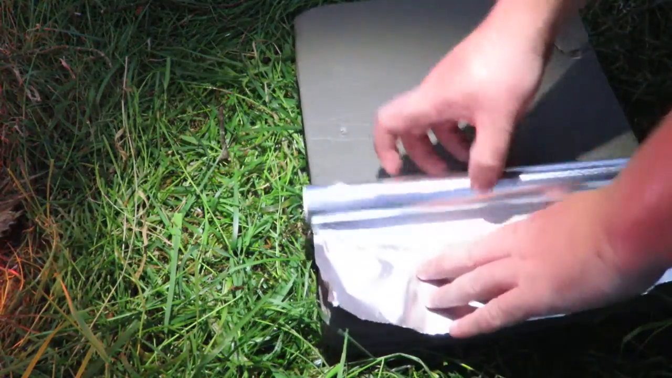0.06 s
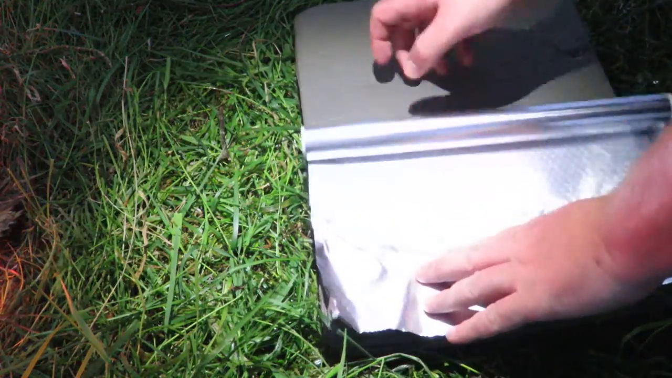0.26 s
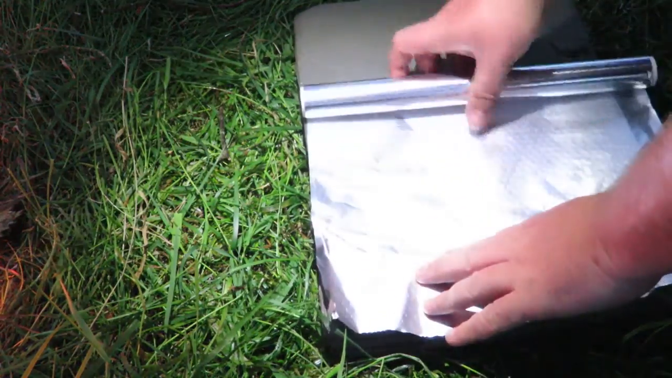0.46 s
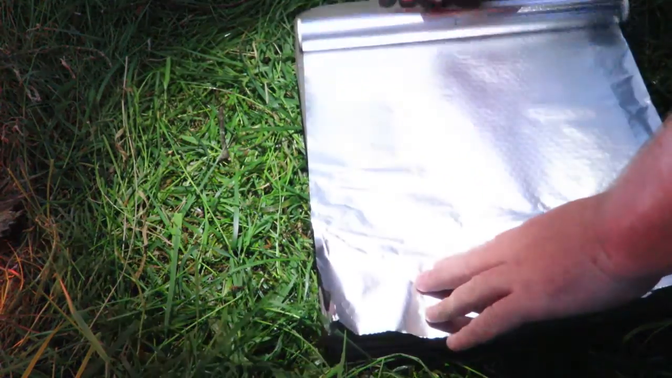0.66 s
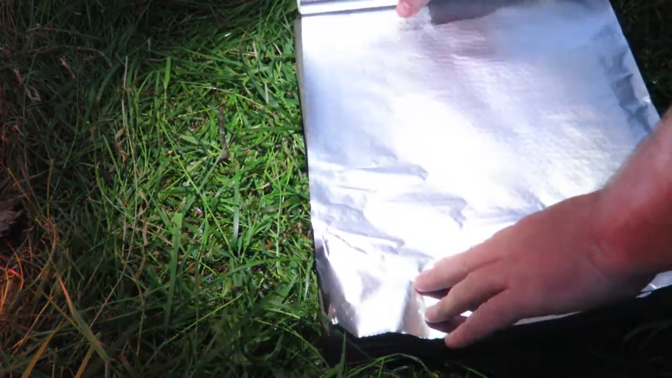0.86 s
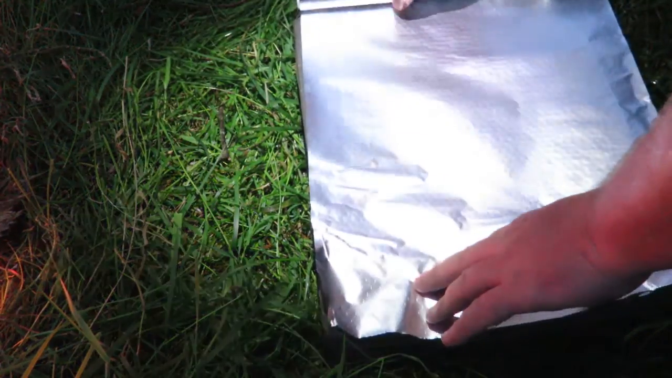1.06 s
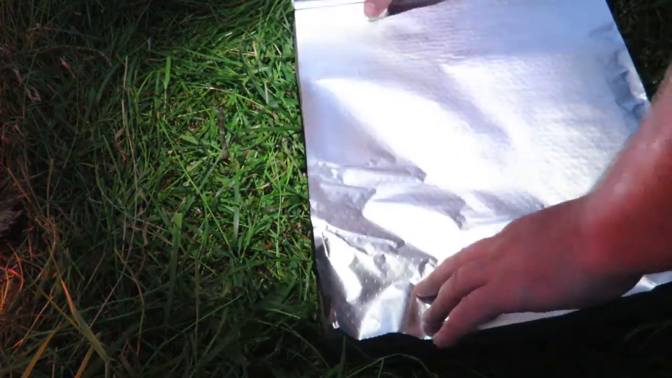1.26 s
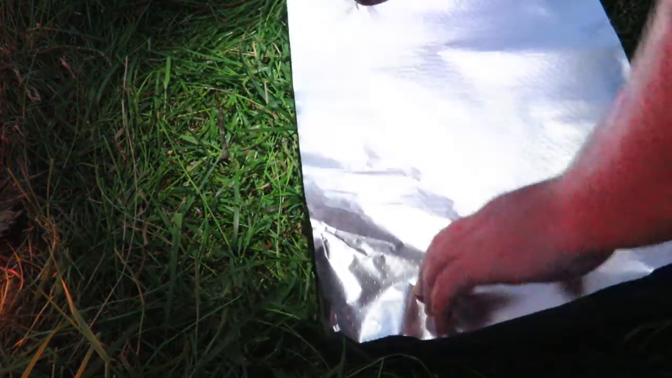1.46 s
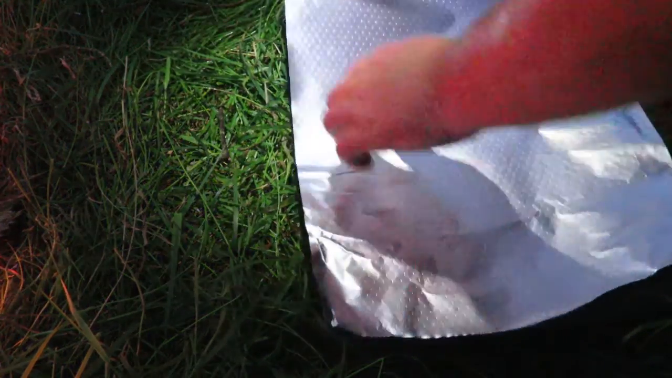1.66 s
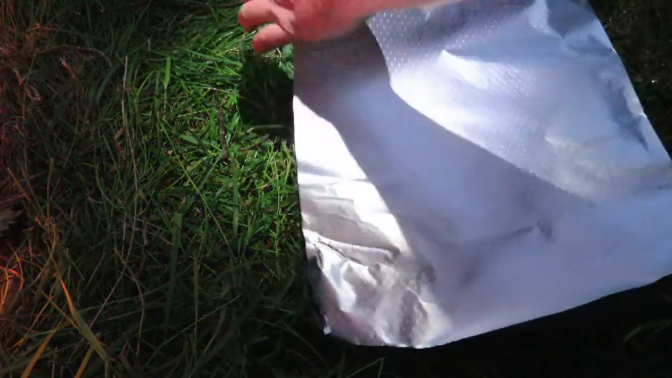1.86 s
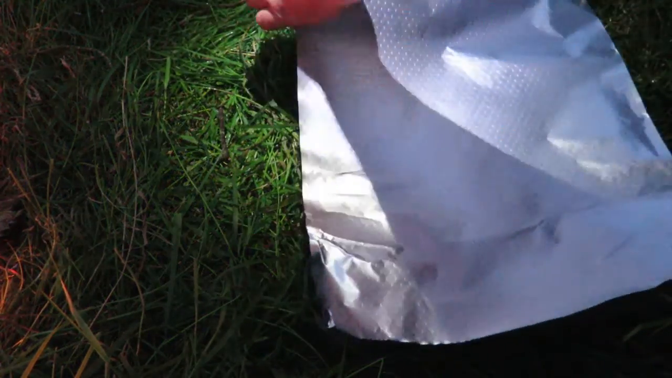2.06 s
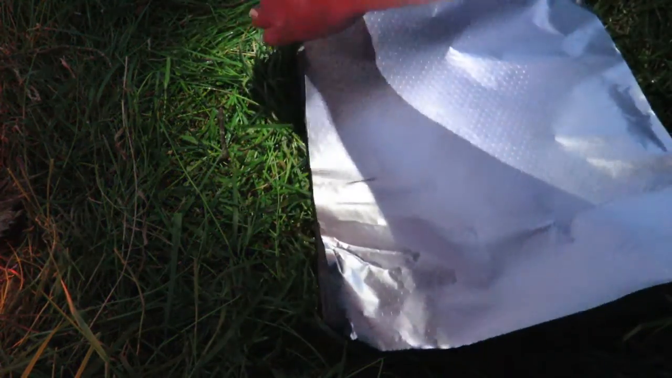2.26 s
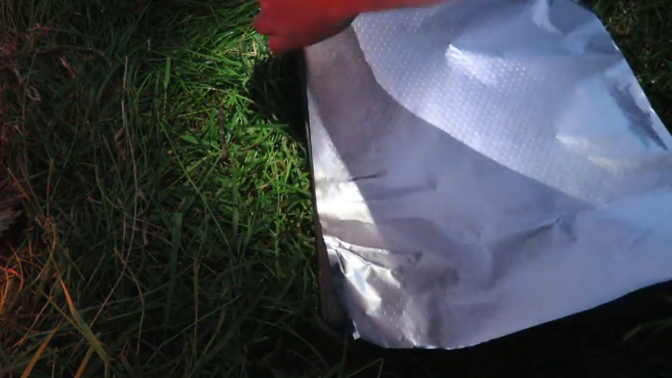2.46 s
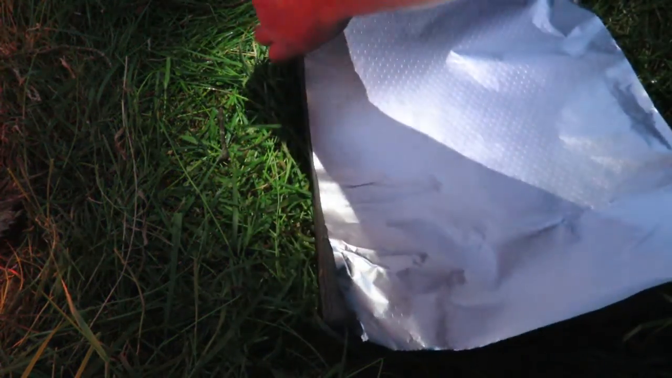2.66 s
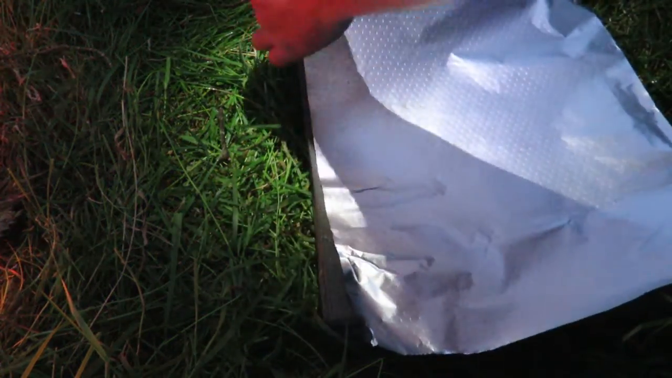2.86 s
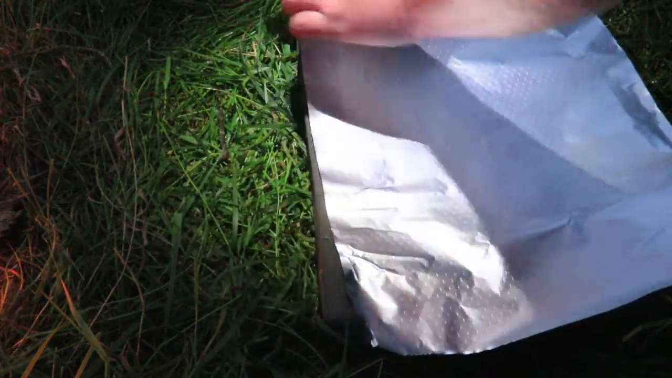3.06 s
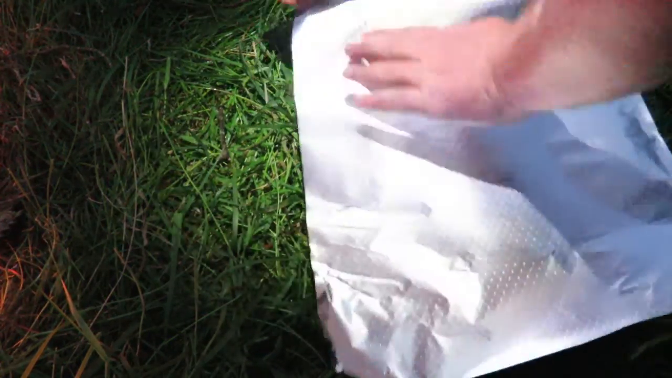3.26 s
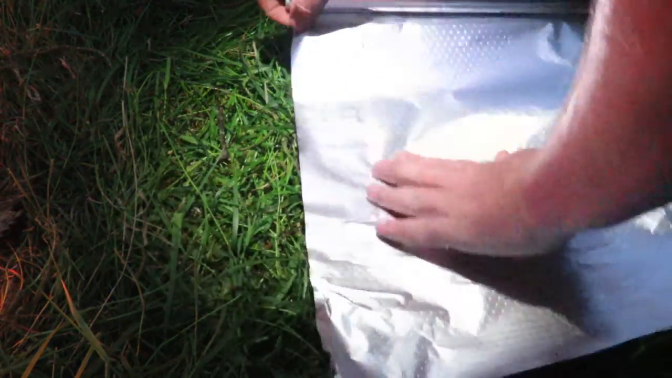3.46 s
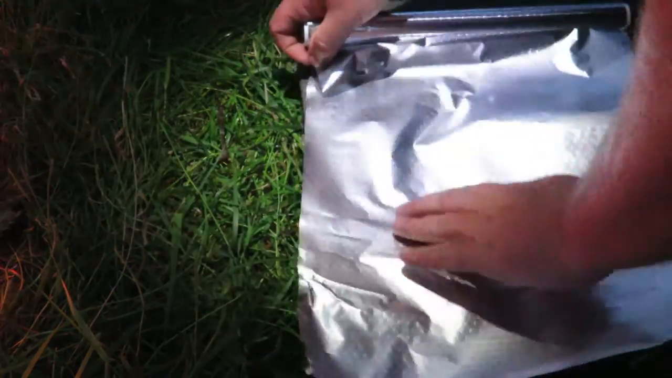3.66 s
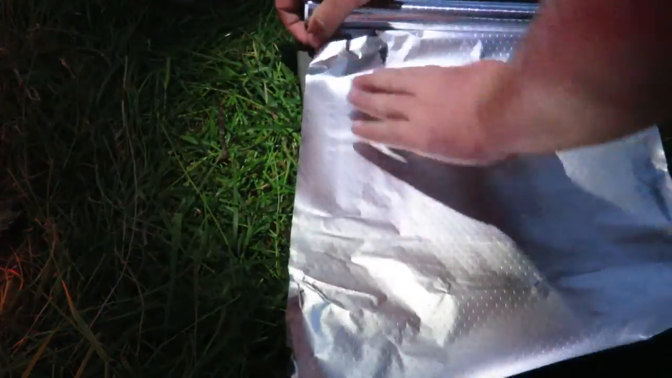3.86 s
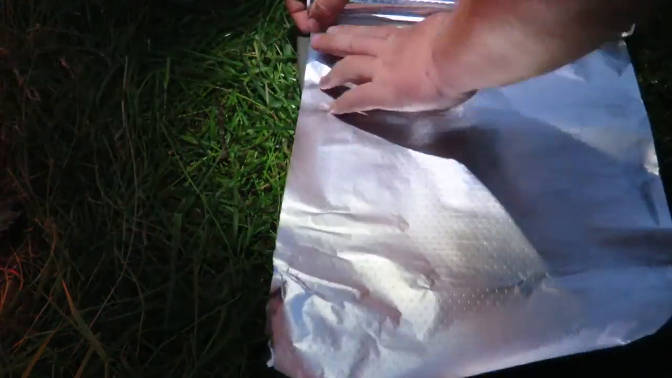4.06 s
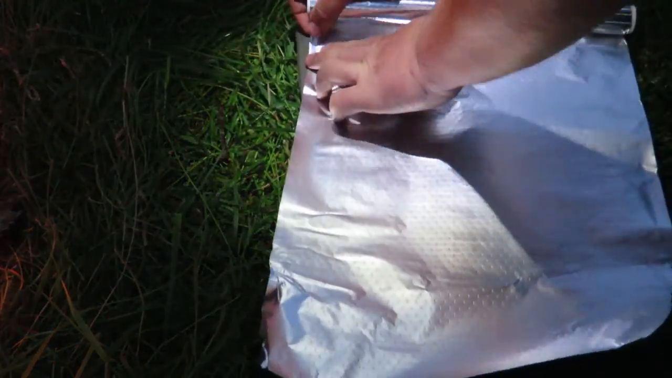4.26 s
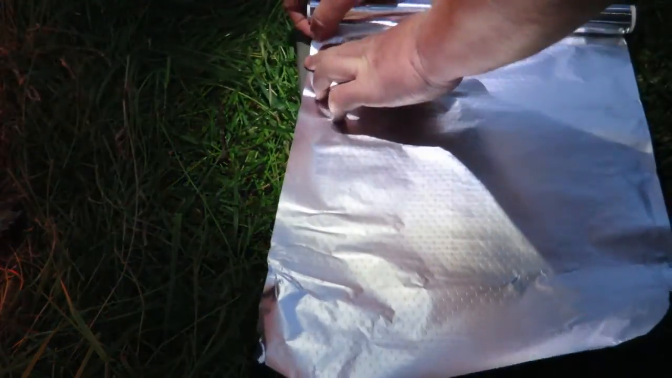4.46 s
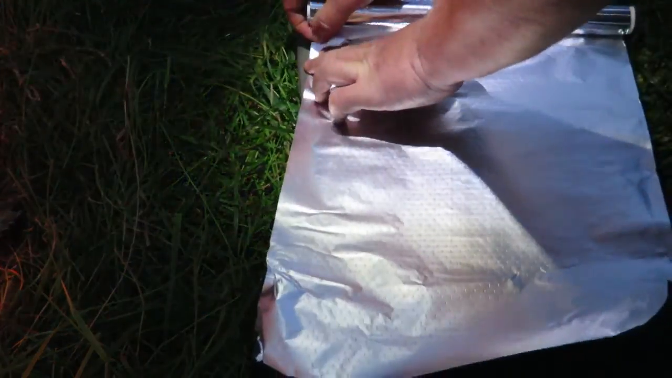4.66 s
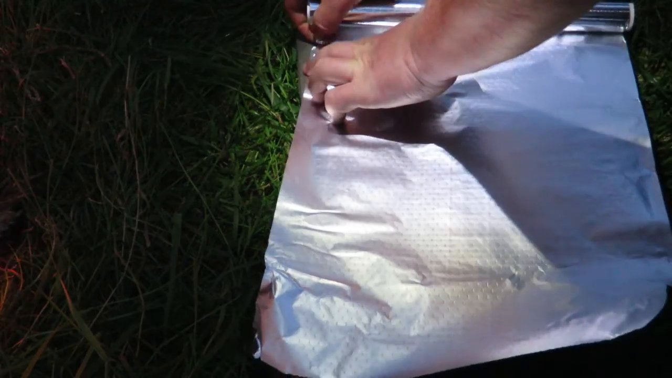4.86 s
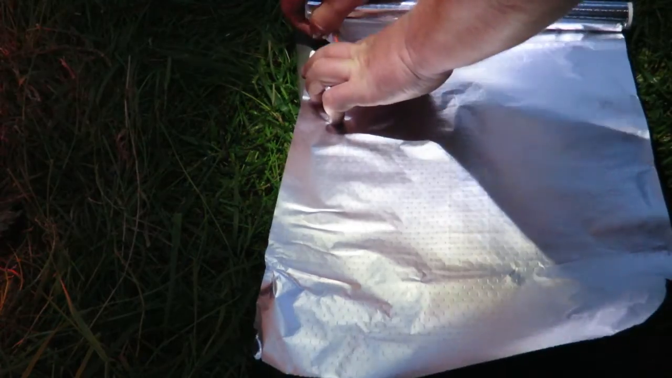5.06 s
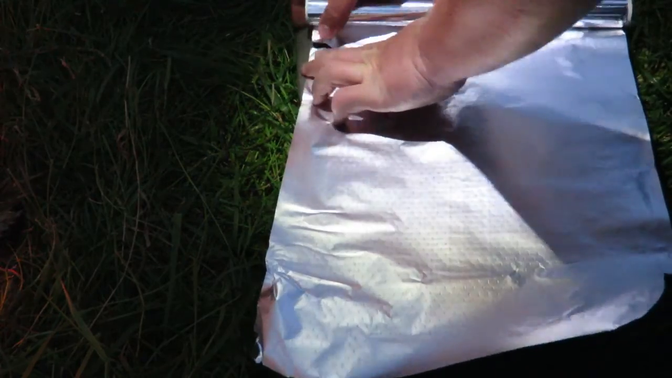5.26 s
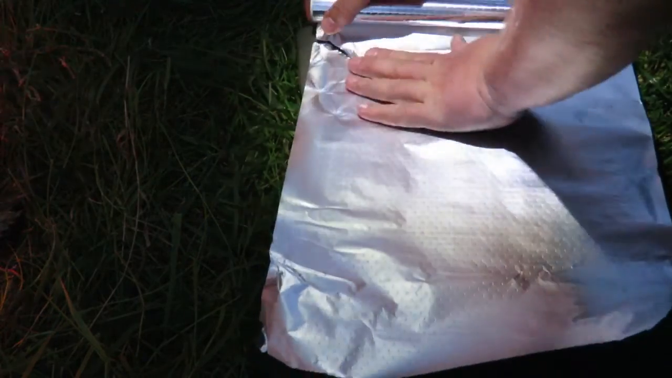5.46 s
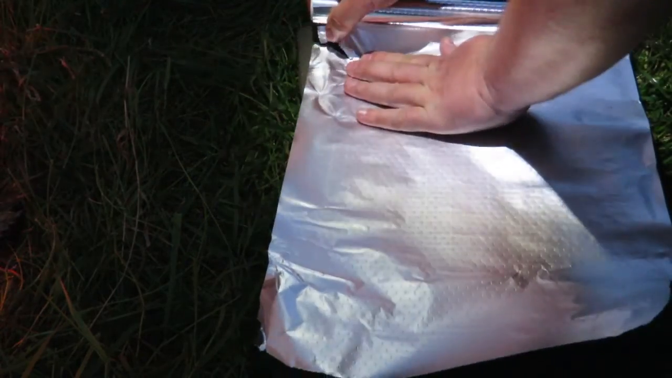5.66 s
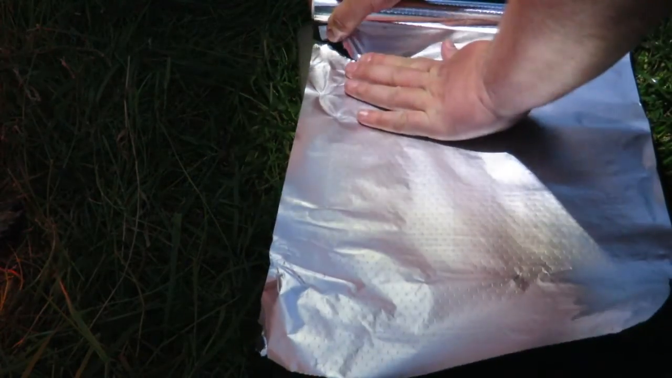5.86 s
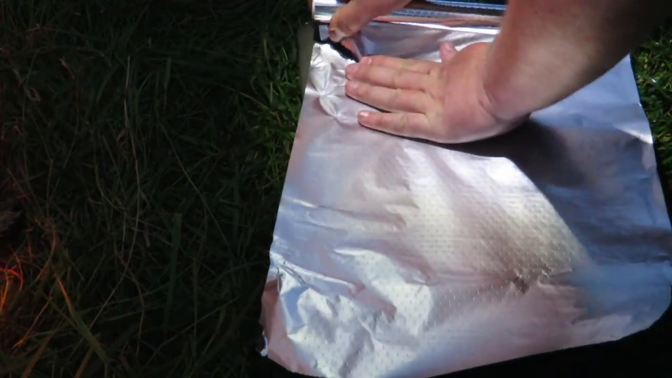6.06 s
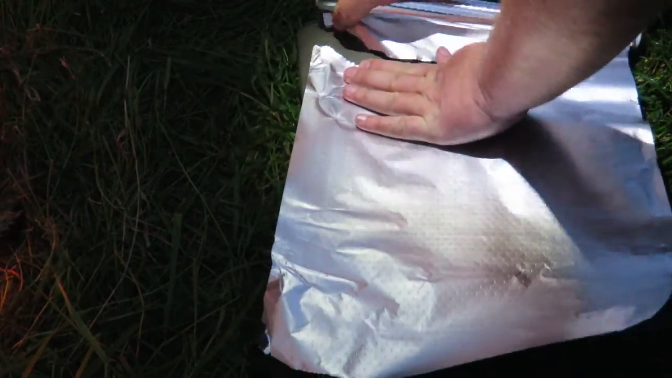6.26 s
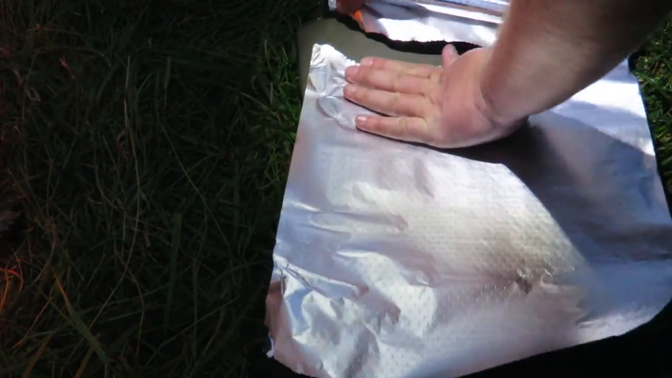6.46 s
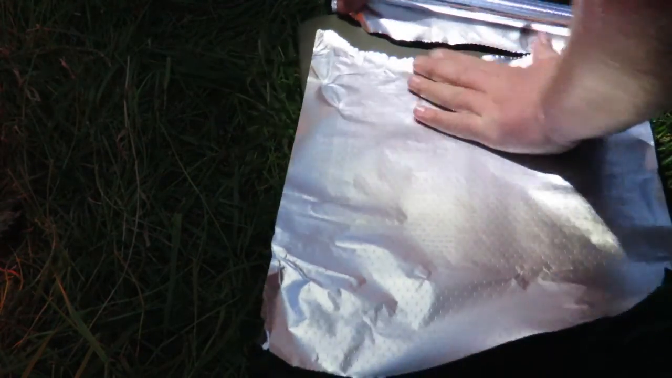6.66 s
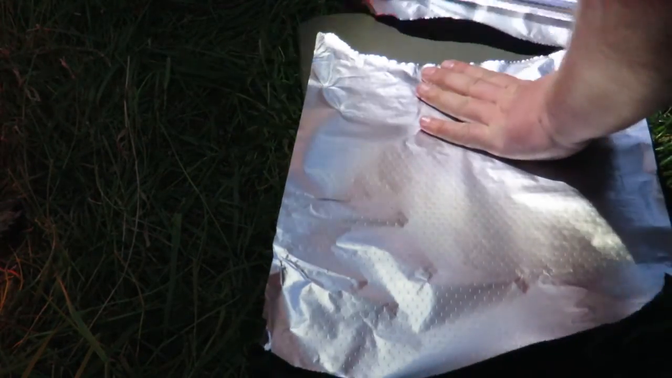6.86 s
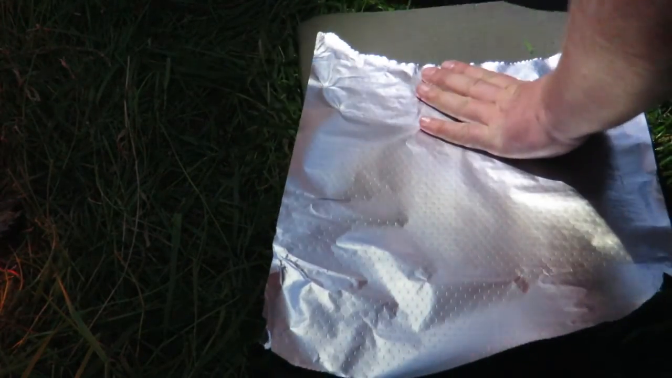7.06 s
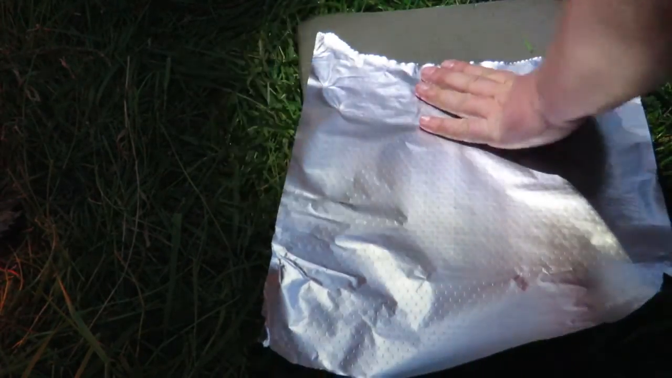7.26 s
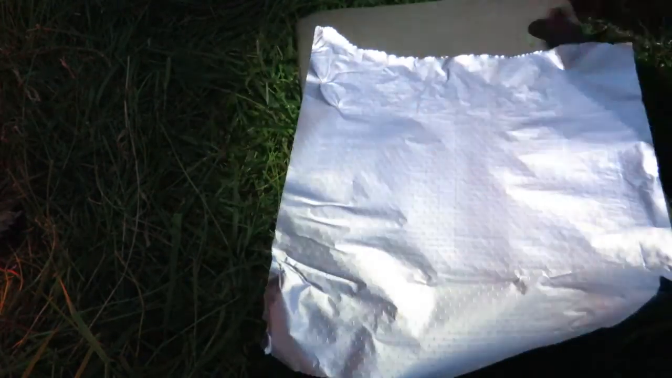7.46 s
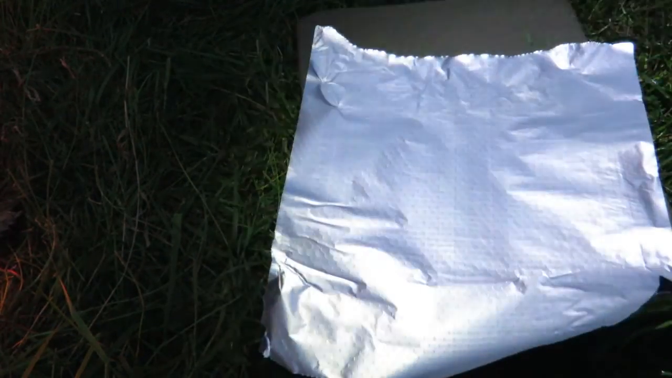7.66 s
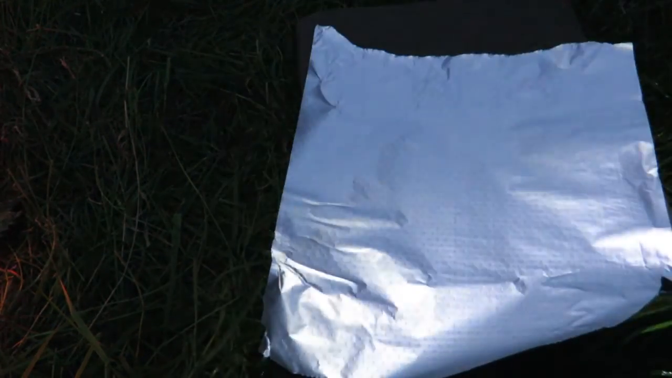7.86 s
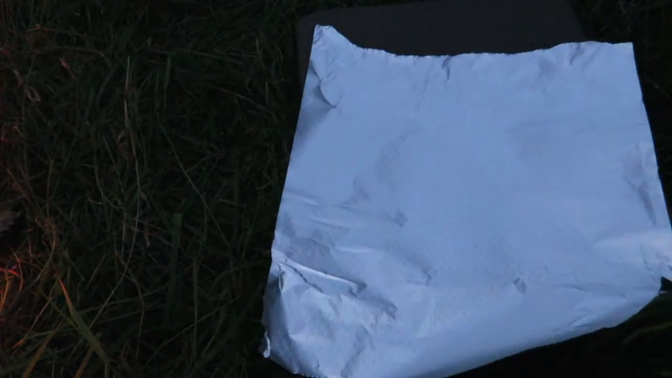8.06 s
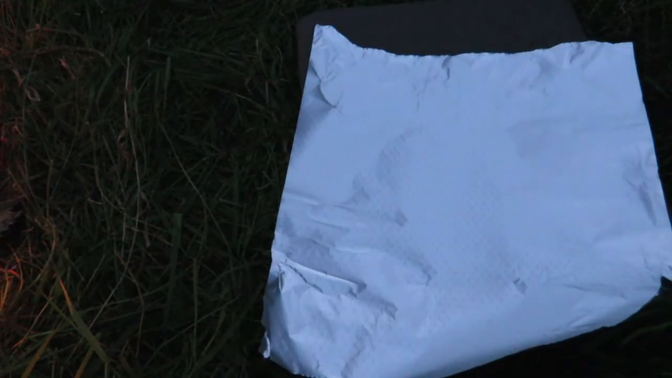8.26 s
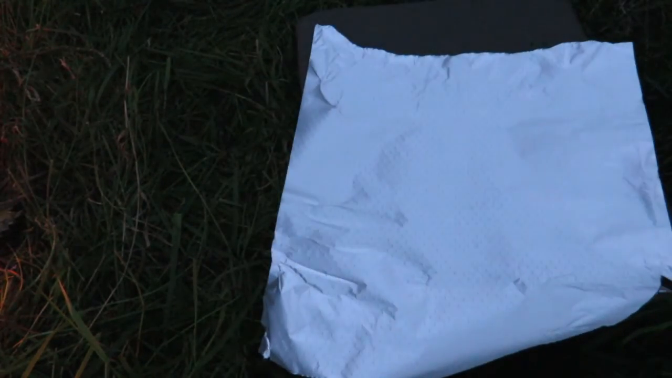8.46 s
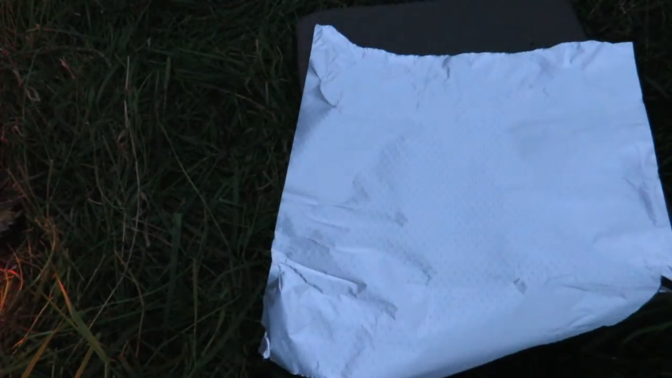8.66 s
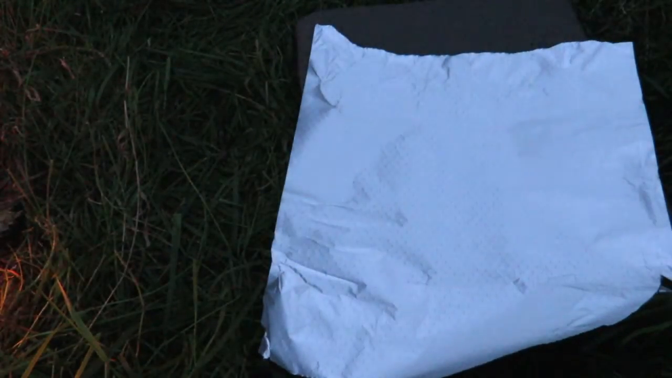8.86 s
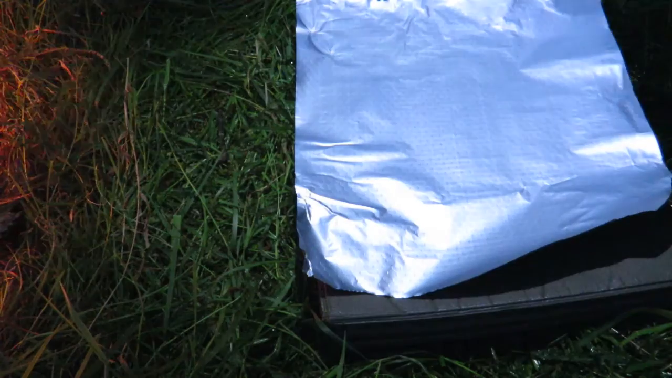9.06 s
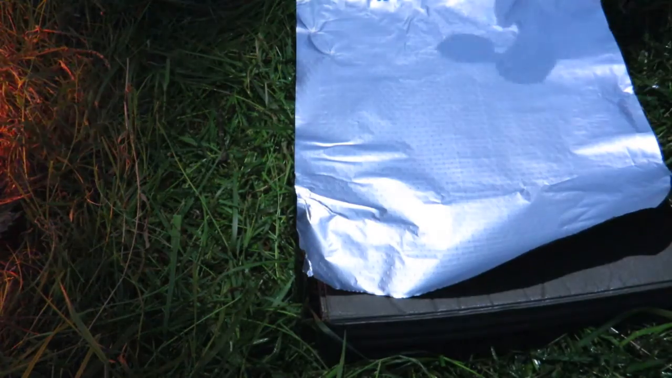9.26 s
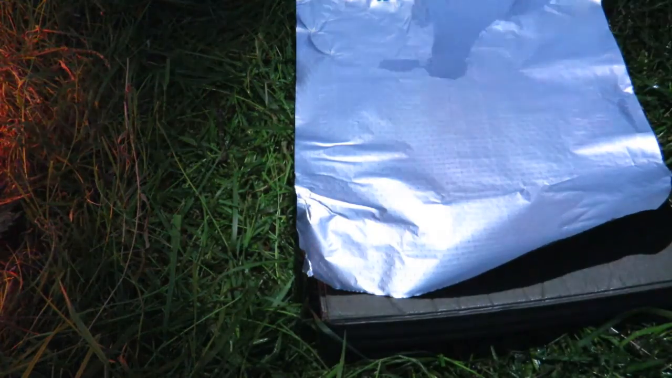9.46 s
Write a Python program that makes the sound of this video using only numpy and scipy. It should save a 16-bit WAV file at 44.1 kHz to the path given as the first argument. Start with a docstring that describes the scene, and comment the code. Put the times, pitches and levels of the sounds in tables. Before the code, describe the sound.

A sheet of aluminium foil is handled very close to the microphone in the open air, dry, nearly mono, over a soft fluttering low rumble. It starts at once with a crisp crumple, then thin sliding rustle and metallic crackle as the foil unrolls, with sharp snaps near 0.4 and 0.9 seconds and small board knocks around 1 and 1.5. From 1.2 to 3.3 seconds the crinkling is dense, bright and loud, surging strongly around 2.5 to 2.9, with light bumps near 3. Hand strokes rustle on to 4.2. Between 4.3 and 6.1 the pinched foil crackles in separate hard pops and short crumples. A knock and crumple at 6.3 lead into tearing rasps until 7.1. After a brief lull, a burst at 7.7 and scattered ticks around 8.4 settle into faint rustling and rumble by 9.5.

```python
"""Aluminium foil is unrolled over a board on a lawn, torn off and smoothed by hand, heard close and near-mono.
Strokes, collapsing folds and pulls drive thousands of tiny creases: each buckle cracks, rings its facet
for milliseconds and spreads as a noisy wash. Single dents snap through as loud millisecond bursts.
Hand and roll knock the board now and then (damped sine plus thud).
Underneath lies a soft, fluttering outdoor rumble of coloured noise."""
import sys
import numpy as np
from scipy import signal
from scipy.fft import rfft, irfft
from scipy.io import wavfile
from scipy.ndimage import uniform_filter1d

SR = 44100
rng = np.random.default_rng(int(sys.argv[2]) if len(sys.argv) > 2 else 0)


def transcribe(u):
    """Save the signal u as a 16-bit wav file named by the first command-line argument.

    u: samples, shape (n,) or (channels, n), limited to [-1, 1]; the rate is SR.
    q: integer samples, one column per channel.
    """
    v = np.clip(np.atleast_2d(u).T, -1, 1)
    q = np.round(v * 32767).astype(np.int16)
    wavfile.write(sys.argv[1], SR, q)


N = 418950


def undb(db):
    """Decibels to amplitude gain."""
    return 10 ** (np.asarray(db) / 20)


def unit(x):
    """Scale to rms 1."""
    return x / np.sqrt(np.mean(x ** 2))


def curves(table):
    """Each column of a timed table, interpolated per sample."""
    time_s, *columns = np.transpose(table)
    return [np.interp(np.arange(N) / SR, time_s, column) for column in columns]


def add(track, start_s, sound):
    """Mix a short sound into the track in place."""
    start = max(int(start_s * SR), 0)
    track[start:start + len(sound)] += sound[:N - start]


def response(points, size=2048):
    """Minimum-phase impulse response of a (Hz, dB) colour, via the folded cepstrum."""
    hz, db = np.transpose(points)
    grid_hz = np.maximum(np.arange(size // 2 + 1) * SR / size, 1)
    gain_db = np.interp(np.log(grid_hz), np.log(hz), db)
    cepstrum = irfft(np.log(undb(gain_db)))
    cepstrum[1:size // 2] *= 2
    cepstrum[size // 2 + 1:] = 0
    return irfft(np.exp(rfft(cepstrum)))


def colour(x, points):
    """Filter a sound by a (Hz, dB) colour."""
    return signal.oaconvolve(x, response(points))[:len(x)]


def band(x, hz, kind, order=2):
    """Zero-phase Butterworth filter: neighbouring bands add up flat."""
    sos = signal.butter(order, hz, kind, fs=SR, output="sos")
    return signal.sosfiltfilt(sos, x, padlen=0)


def steady(x, window_s):
    """Hold the running rms at 1."""
    power = np.abs(uniform_filter1d(x ** 2, int(window_s * SR)))
    return x / np.sqrt(power + 1e-9)


def wander(per_s):
    """Random drift of rms 1, linear between per_s random points a second."""
    steps = rng.standard_normal(int(per_s * N / SR) + 2)
    return unit(np.interp(np.arange(N) * per_s / SR, np.arange(len(steps)), steps))


def scatter(kicks, decay_s):
    """Each kick spreads as bending waves that die away: noise carrying the kick's energy."""
    keep = np.exp(-2 / (decay_s * SR))
    energy = signal.lfilter([1 - keep], [1, -keep], kicks ** 2 + 1e-18)
    return np.sqrt(energy) * rng.standard_normal(len(kicks))


# colour of the open air: (frequency [Hz], relative gain [dB])
AIR_COLOUR = [(15, -56), (25, -16.5), (120, -1.5), (250, -11), (840, -18.5), (1040, -28), (8830, -41)]
# swell of the rumble: (time [s], relative level [dB])
BREEZE_SWELL = [(0, -2), (4.2, -4.5), (9.5, 3)]
AIR_DB, FLUTTER_RMS_DB = -44.5, 1.5


def outdoors():
    """Low, fluttering rumble with faint hiss: coloured noise, almost the same in both channels."""
    swell_db, = curves(BREEZE_SWELL)
    mid = unit(colour(rng.standard_normal(N), AIR_COLOUR))
    side = unit(colour(rng.standard_normal(N), AIR_COLOUR))
    side = band(side, 155, "highpass", order=1)  # long waves reach both ports alike
    stereo = mid + undb(-19) * side * np.array([[1], [-1]])
    return stereo * undb(AIR_DB + swell_db + FLUTTER_RMS_DB * wander(22))


# bumps on the board: (time [s], level of the ring before onset and decay [dB], ring [Hz])
BOARD_BUMPS = [(0.963, -19.5, 613), (1.511, -16, 563), (2.847, -23, 812), (3.009, -21.5, 553),
               (6.319, -22, 779)]


def bumps(size=4096):
    """Hand and roll knock the board under the foil: a damped ring plus a low noise thud."""
    out, t = np.zeros(N), np.arange(size) / SR
    onset = 1 - np.exp(-t / 0.00012)
    for time_s, db, hz in BOARD_BUMPS:
        board = np.sin(2 * np.pi * hz * t) * np.exp(-t / 0.0085)
        noise = unit(band(rng.standard_normal(size), 1200, "lowpass", order=1))
        thud = noise * np.exp(-t / 0.0056)
        add(out, time_s, (board + 1.3 * thud) * onset * undb(db))
    return band(out, 120, "highpass", order=1)


# colour of the sheet, also used by crinkle: (frequency [Hz], relative gain [dB])
FOIL_COLOUR = [(88, -40), (150, -12), (270, -14.5), (480, -7), (2450, -5), (3350, -2), (5360, -3.5),
               (6510, -5), (8300, 2.5), (10400, -10), (13700, -9), (16000, -22)]
# a sliding or tearing sheet hisses densely, a pinched or loose one crackles; also used by crinkle:
# (time [s], base buckling rate [1/s])
BUCKLING_RATE = [(1.0, 1240), (1.7, 2840), (3.9, 2940), (4.4, 400), (6.2, 525), (6.35, 2270), (7.13, 2120),
                 (7.25, 596), (8.3, 1300)]
# dents snapping through: (time [s], peak [dB], ring [Hz])
DENT_SNAPS = [(0.431, -6, 8400), (0.942, -7, 2900), (1.368, -7, 7400), (1.455, -3, 8400), (1.985, -9, 1900),
              (3.13, -6, 2100), (3.174, -5, 3300), (4.114, -11, 3000), (4.36, -4, 6900), (4.388, -3, 4300),
              (4.455, -8, 5200), (4.476, -13, 3800), (4.517, -3, 4700), (4.55, -7, 2530),
              (4.635, -12, 1500), (4.716, -16, 1900), (4.761, -12, 1300), (4.865, -16, 7000),
              (4.893, -13, 4000), (4.994, -4, 2900), (5.014, -7, 3200), (5.088, -11, 4200),
              (5.101, -9, 1400), (5.155, -3, 1400), (5.358, -12, 3600), (5.406, -10, 4000),
              (5.411, -7, 3790), (5.472, -4, 10200), (5.699, -5, 3000), (5.73, -6, 2040), (5.85, -9, 8000),
              (5.875, -8, 2100), (5.883, -5, 1800), (6.09, -9, 8000), (6.098, -2, 7500), (6.264, -13, 830),
              (7.731, -10, 12600), (7.782, -7, 8600), (7.809, -14, 7000), (7.826, -11, 8600),
              (8.116, -8, 6200), (8.377, -13, 3000), (8.413, -3, 9600), (8.438, -8, 4800),
              (8.61, -14, 11700), (8.991, -22, 1800)]
CRACK_S = 0.00067  # time to the height of the burst envelope


def snaps(size=2048):
    """A larger dent gives way in a millisecond burst that rings its facet; less wash where the foil is pinched."""
    out, t = np.zeros(N), np.arange(size) / SR
    rate, = curves(BUCKLING_RATE)
    burst = t / CRACK_S * np.exp(-t / CRACK_S)
    for time_s, db, hz in DENT_SNAPS:
        crack = unit(burst * rng.standard_normal(size))
        facet = unit(burst * np.sin(2 * np.pi * hz * t))
        freedom = np.sqrt(rate[int(time_s * SR)] / rate.mean())
        wash = unit(scatter(burst, decay_s=0.0045)) * freedom
        dent = colour(crack + 0.55 * facet + undb(-1) * wash, FOIL_COLOUR)
        add(out, time_s, dent / np.abs(dent).max() * undb(db))
    return out


def ring(hz, cycles, size=1024):
    """Brief ring of one facet: a sine that decays to 1/e in the given cycles."""
    t = np.arange(size) / SR
    return unit(np.sin(2 * np.pi * hz * t) * np.exp(-t * hz / cycles))


def avalanches(per_s, decay_s):
    """Strain lets go in random slips, each dying down exponentially."""
    slips = (rng.random(N) < per_s / SR) * rng.exponential(size=N)
    return signal.lfilter([1], [1, -np.exp(-1 / (decay_s * SR))], slips)


def creases(rate, count=24):
    """Creases buckle at random, more strongly in an avalanche; most are tiny, a few large."""
    samples = np.interp(np.arange(int(rate.sum() / SR)), np.cumsum(rate) / SR, np.arange(N))
    chance = rng.random((len(samples), 3))
    where = np.minimum(samples + chance[:, 0] * SR * .01, N - 1).astype(int)
    strength = np.minimum(-np.log(1 - chance[:, 1]), 4.5)
    freedom = (rate / rate.mean()) ** .6
    surge = avalanches(per_s=55, decay_s=0.0078)[where]
    sizes = undb(3.4 * strength) * np.sqrt(0.46 * freedom[where] + surge ** 2)

    # each facet gives a broad, quickly damped colour and takes a changing share
    facet = (chance[:, 2] * count).astype(int)
    ringing = sizes ** .6  # large buckles crack more than they ring
    rings = 0
    for k, hz in enumerate(np.geomspace(420, 14000, count)):
        pushes = np.bincount(where[facet == k], ringing[facet == k], N) * undb(4.33 * wander(16))
        rings = rings + signal.oaconvolve(pushes, ring(hz, cycles=2.5) * np.sqrt(hz))[:N]

    kicks = unit(np.bincount(where, sizes, N))
    cracks = 0.19 * kicks + scatter(kicks, decay_s=0.0054)
    wash = scatter(kicks, decay_s=0.03)
    # a freely sliding sheet rings on; fingers that pinch it damp it
    out = cracks + freedom * (undb(-0.5) * unit(rings) + undb(4.5) * wash)
    return steady(out, window_s=0.044)


# foil drawn taut: (start [s], end [s], nominal ring at mid-span [Hz], lift setting [dB])
TAUT_STRETCHES = [(0.15, 0.847, 1630, 8.5), (1.874, 2.796, 3214, 5), (2.221, 2.677, 1852, 6.5),
                  (8.283, 8.451, 2900, 8.5)]
TAUT_SAG_OCT_PER_S, TAUT_WAVER_RMS_OCT = 0.3, 0.09


def resonances(x):
    """Each taut stretch lifts one broad band, which sinks as the free foil lengthens and wavers as it flexes."""
    out = x.copy()
    for start_s, end_s, hz, db in TAUT_STRETCHES:
        span = slice(int(start_s * SR), int(end_s * SR))
        since_middle_s = np.arange(N)[span] / SR - (start_s + end_s) / 2
        shift_oct = TAUT_WAVER_RMS_OCT * wander(17)[span] - TAUT_SAG_OCT_PER_S * since_middle_s
        centre_hz = hz * 2 ** shift_oct
        # shift the band to 0 Hz, low-pass, shift back
        turn = np.exp(2j * np.pi * np.cumsum(centre_hz) / SR)
        keep = np.exp(-np.pi * hz / 2.8 / SR)  # Q 2.8
        rung = 2 * np.real(turn * signal.lfilter([1 - keep], [1, -keep], x[span] / turn))
        add(out, start_s, rung * signal.windows.tukey(len(rung)) * (undb(db) - 1))
    return out


# Moves: level is that of the creases before CRINKLE_DB; wrinkles are relative to it.
# steady sliding and rustling: (time [s], level [dB], fine wrinkles [dB])
SLIDING = [(0.14, -37, 0), (1.04, -34, -4), (1.08, -54, -2), (1.17, -41, 3), (1.92, -32, -0.5),
           (2.64, -23, -6.5), (2.85, -40, -6), (3.32, -28, -7), (4.72, -41, -4.5), (5.38, -31, 0),
           (7.07, -40, -21), (7.21, -50, 1), (7.45, -35.5, -1), (8.03, -44, -4), (8.54, -38, 1.5),
           (8.98, -49.5, 0.5), (9.5, -45.5, -6)]
# hand brushes over the sheet: (time of height [s], level [dB], swell [s], fine wrinkles [dB])
HAND_STROKES = [(0.27, -29, 0.011, 7), (0.536, -24, 0.023, 5.5), (1.019, -32, 0.019, 9),
                (1.215, -23, 0.018, 4), (1.258, -22, 0.066, 2.5), (1.514, -18, 0.024, 5),
                (1.637, -24, 0.044, 3), (1.779, -21, 0.055, 1.5), (1.979, -22, 0.059, -4.5),
                (2.315, -26, 0.11, -4.5), (2.489, -19.5, 0.021, -4), (3.017, -20, 0.037, -6),
                (3.265, -18.5, 0.059, -0.5), (3.56, -19, 0.06, 3.5), (3.915, -27.5, 0.058, 2),
                (4.395, -32, 0.081, 1), (5.673, -21, 0.057, -2), (5.992, -23, 0.083, -1.5),
                (6.189, -30, 0.028, 1.5), (6.558, -20, 0.039, 3), (6.668, -24, 0.031, 5)]
FADE_PER_SWELL = 1.2
# a fold collapses, its creases settle: (time of height [s], level [dB], settling [s], fine wrinkles [dB])
FOLD_CRUMPLES = [(0.037, -20, 0.022, 6), (0.065, -21, 0.028, 8), (0.385, -29, 0.26, 0),
                 (2.06, -18, 0.09, -1), (2.584, -16, 0.019, -9), (2.688, -22, 0.059, -7),
                 (2.847, -14, 0.025, -3), (2.91, -24, 0.03, -3), (3.326, -21.5, 0.089, 3),
                 (3.745, -23, 0.081, 1), (4.127, -18, 0.029, -2), (4.171, -21, 0.097, 0),
                 (5.007, -26, 0.04, 1), (5.122, -24, 0.07, -8), (5.151, -19, 0.08, -1),
                 (6.305, -18, 0.2, 0), (7.309, -31.5, 0.017, 5), (7.479, -28, 0.023, 0),
                 (7.671, -25, 0.034, 4), (7.783, -31, 0.062, 2.5), (8.089, -26.5, 0.074, 0.5),
                 (8.304, -30.5, 0.13, -1), (8.711, -38, 0.014, 12), (9.442, -36.5, 0.039, -2.5)]
COLLAPSE_S = 0.0035
# pull until the foil gives way or tears: (time it gives [s], level [dB], build-up [s], fine wrinkles [dB])
FOIL_PULLS = [(0.015, -20, 0.039, 3.5), (0.765, -29, 0.14, 1), (0.915, -21, 0.034, -4),
              (0.966, -26, 0.041, -5), (1.461, -21, 0.047, 3.5), (4.607, -31, 0.17, -2),
              (5.784, -27.5, 0.032, -1), (6.855, -23, 0.088, 5), (7.007, -22, 0.13, 3),
              (7.131, -24, 0.11, 1.5), (7.687, -16.5, 0.017, 0.5)]
GIVE_WAY_S = 0.014


def effort():
    """Levels [dB] of creases and fine wrinkles: strokes, crumples and pulls add power to the sliding."""
    t = np.arange(N) / SR
    slide_db, fine_db = curves(SLIDING)
    creasing = undb(slide_db) ** 2
    wrinkling = undb(slide_db + fine_db) ** 2
    moves = [(s, db, swell_s, FADE_PER_SWELL * swell_s, fine) for s, db, swell_s, fine in HAND_STROKES]
    moves += [(s, db, COLLAPSE_S, settle_s, fine) for s, db, settle_s, fine in FOLD_CRUMPLES]
    moves += [(s, db, build_s, GIVE_WAY_S, fine) for s, db, build_s, fine in FOIL_PULLS]
    for time_s, db, rise_s, fall_s, wrinkle_db in moves:
        near = slice(max(int((time_s - .5) * SR), 0), int((time_s + 1) * SR))
        since_s = t[near] - time_s
        # Gaussian rise, exponential fall
        decay = np.where(since_s < 0, (since_s / rise_s) ** 2, since_s / fall_s)
        power = (undb(db) * np.exp(-decay)) ** 2
        creasing[near] += power
        wrinkling[near] += power * undb(wrinkle_db) ** 2
    return 10 * np.log10(creasing), 10 * np.log10(wrinkling)


# flexing of the broad panels: (time [s], level over the middle range before push loss [dB])
PANEL_FLEX = [(0.0, -12), (0.4, -4), (1.3, -3), (1.7, -12.5), (4.3, -10.5), (5.1, -0.5), (5.4, -10),
              (6.2, -4), (6.7, -10.5), (7.1, -1.5), (8.35, -7.5), (9.5, 4)]
# colour of the last rustles, once the hands have left: (frequency [Hz], relative gain [dB])
SETTLING_COLOUR = [(120, -33), (200, 2), (2600, 5), (8740, 4.5), (16000, -9)]
LET_GO_S, CRINKLE_DB = 7.9, -1.18
PANEL_LOSS_DB_PER_DB, RATE_GAIN_DB_PER_DB = 0.48, 0.44  # per dB of sudden effort


def crinkle():
    """Broad panels, middling creases and fine wrinkles share each buckle; the hand sets their balance."""
    work_db, wrinkle_db = effort()
    rate, = curves(BUCKLING_RATE)
    panel_db, = curves(PANEL_FLEX)
    # a sudden push folds the foil more often; easing off leaves the broad panels
    push_db = work_db - uniform_filter1d(work_db, int(.5 * SR))
    clicks = creases(rate * undb(RATE_GAIN_DB_PER_DB * push_db))
    handled = unit(colour(clicks, FOIL_COLOUR))
    settling = unit(colour(clicks, SETTLING_COLOUR))
    sheet = resonances(np.where(np.arange(N) / SR < LET_GO_S, handled, settling))

    edges_hz = [1400, 6500]
    panels = band(sheet, edges_hz[0], "lowpass", order=3)
    middle = band(sheet, edges_hz, "bandpass", order=3)
    wrinkles = band(sheet, edges_hz[1], "highpass", order=3)
    panels_db = work_db + panel_db - PANEL_LOSS_DB_PER_DB * push_db
    parts = [(panels, panels_db), (middle, work_db), (wrinkles, wrinkle_db)]
    return sum(steady(part, window_s=0.205) * undb(db + CRINKLE_DB) for part, db in parts)


def scene():
    """The foil lies straight ahead, with no walls to echo it."""
    return outdoors() + bumps() + snaps() + crinkle()


TOP_HZ = 15900


def record(dry):
    """The recorder clips at full scale, then cuts the treble above TOP_HZ."""
    limited = np.clip(dry, -1, 1)
    return signal.sosfilt(signal.ellip(10, .1, 80, TOP_HZ, fs=SR, output="sos"), limited)


dry = scene()
out = record(dry)
transcribe(out)
```